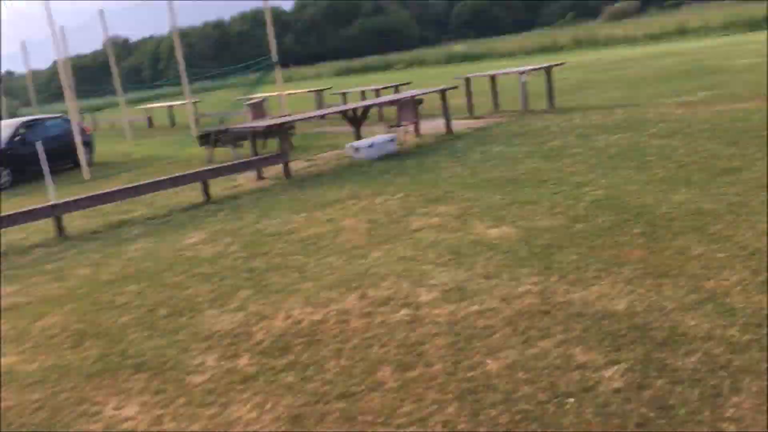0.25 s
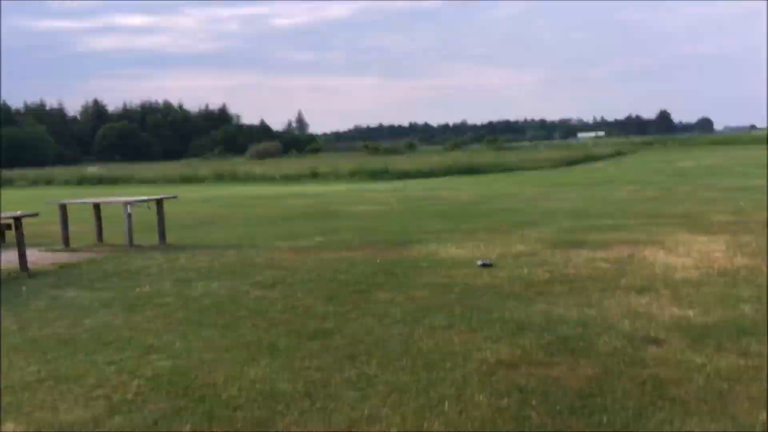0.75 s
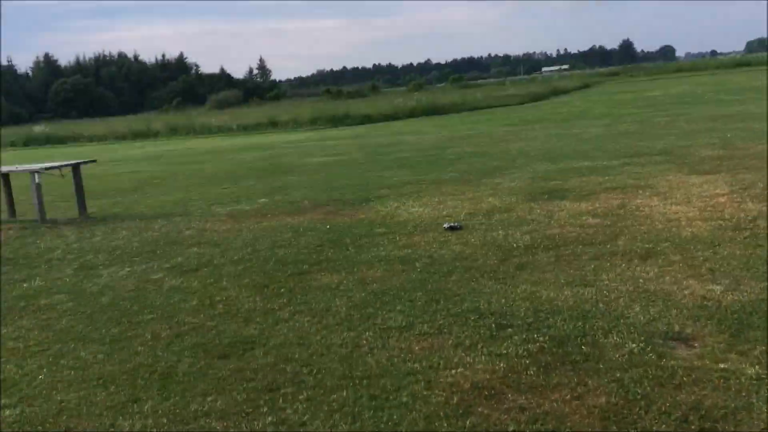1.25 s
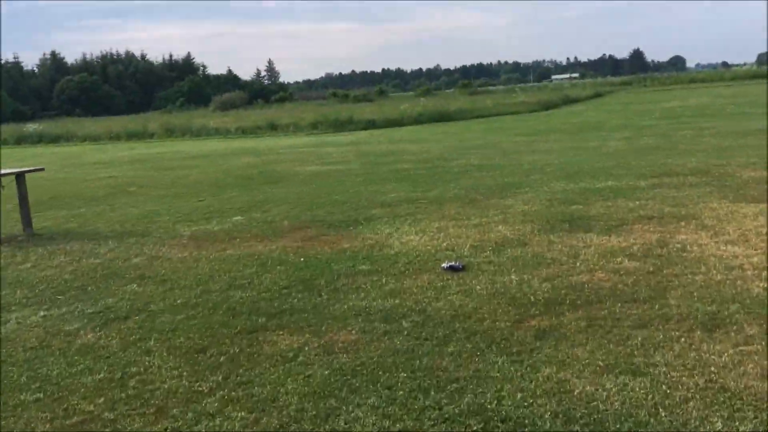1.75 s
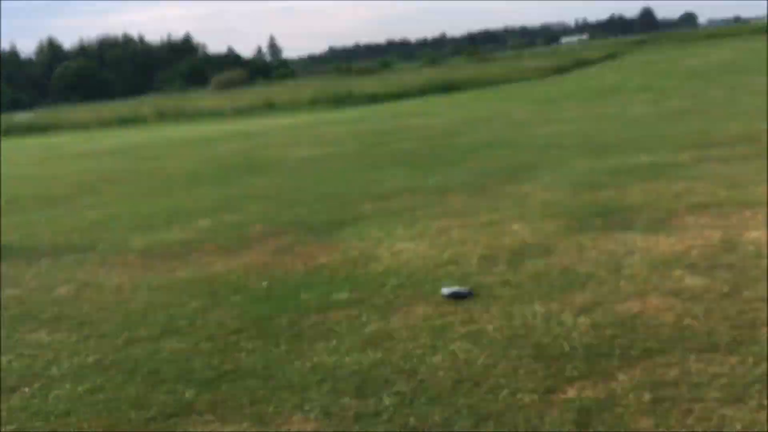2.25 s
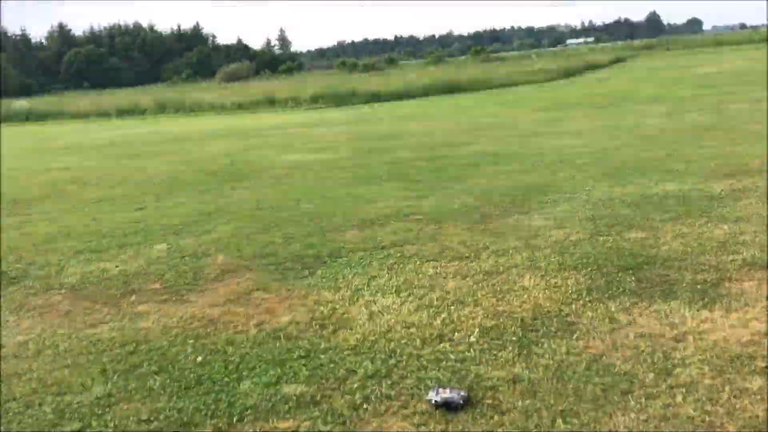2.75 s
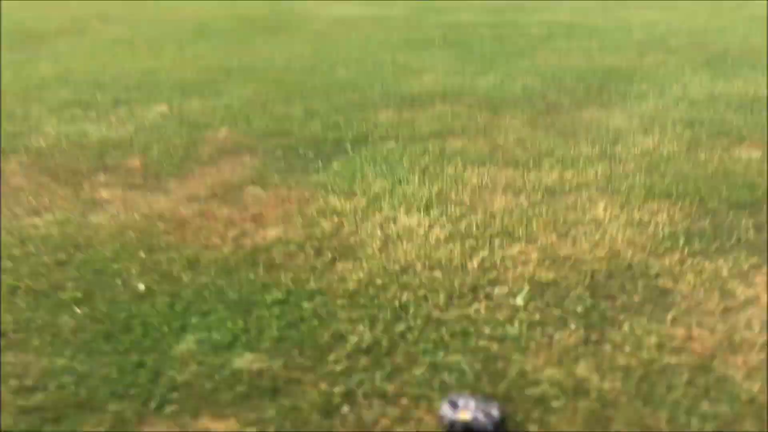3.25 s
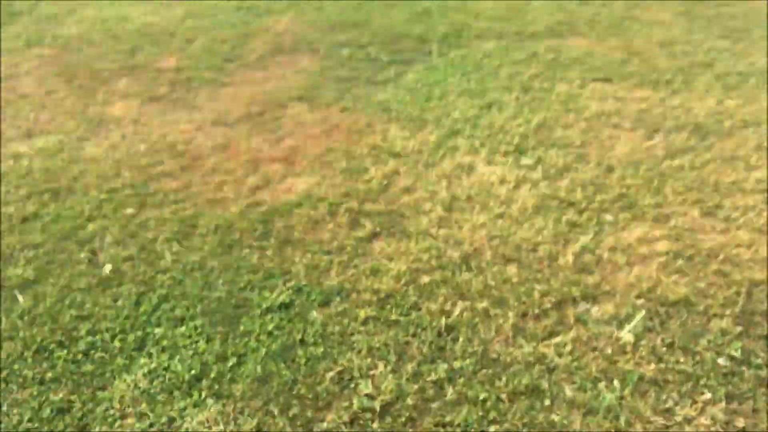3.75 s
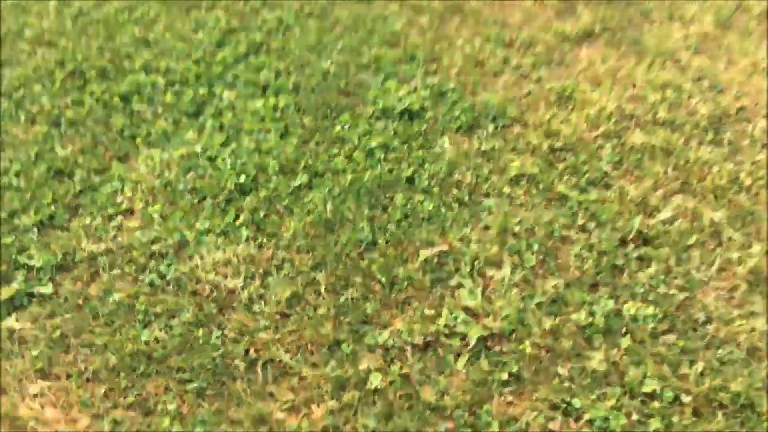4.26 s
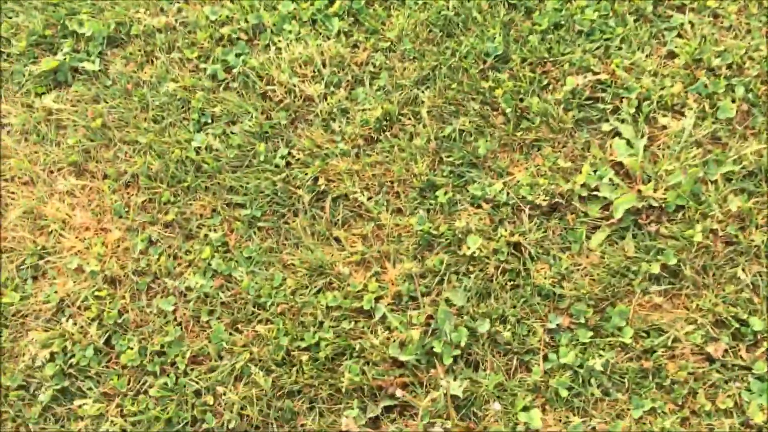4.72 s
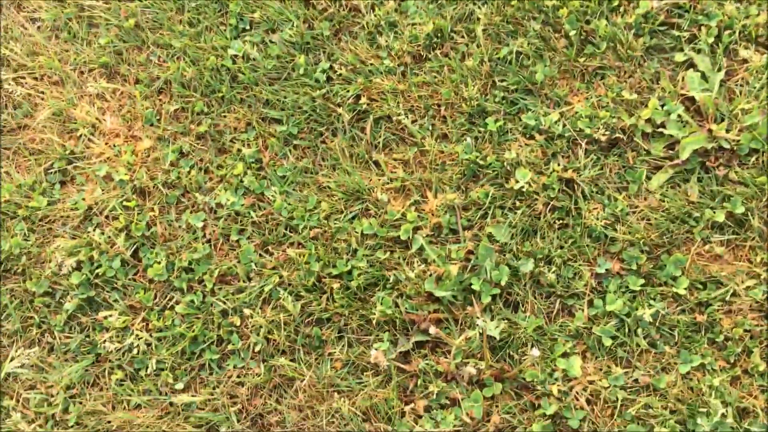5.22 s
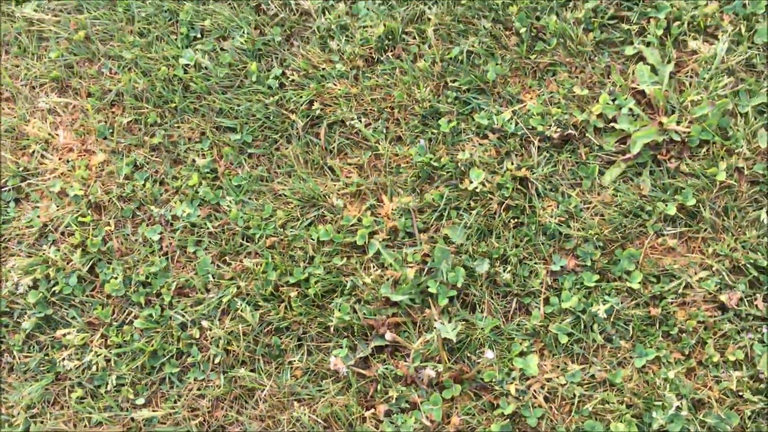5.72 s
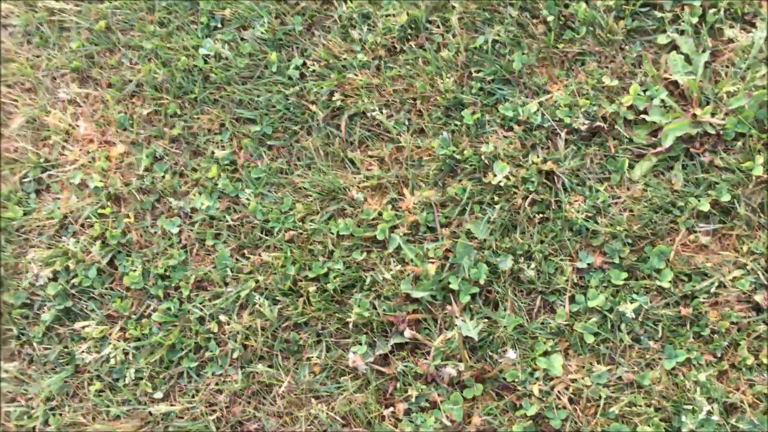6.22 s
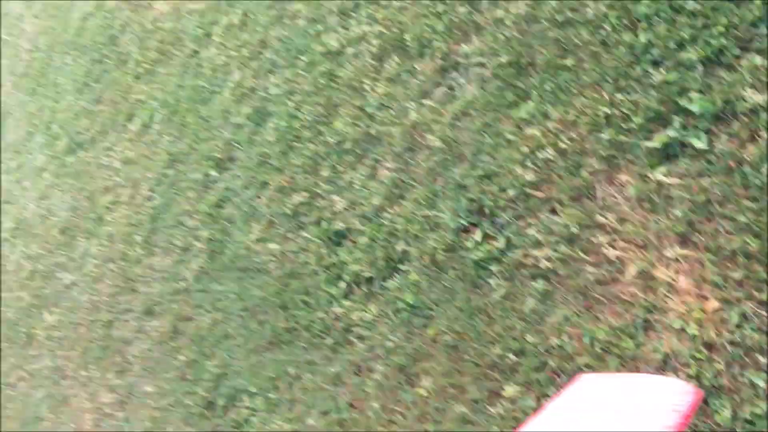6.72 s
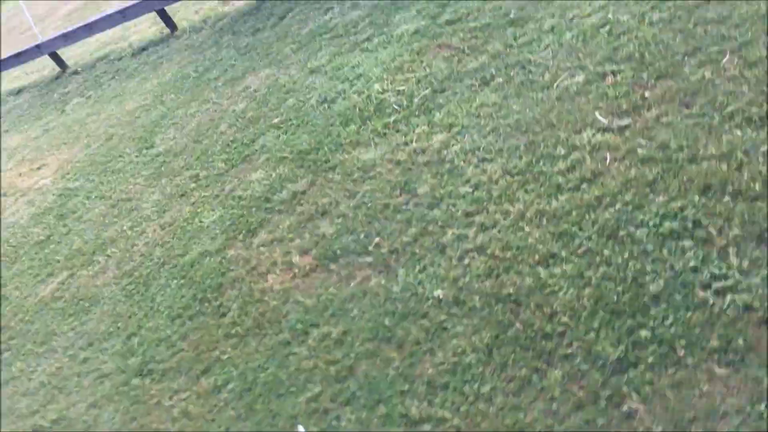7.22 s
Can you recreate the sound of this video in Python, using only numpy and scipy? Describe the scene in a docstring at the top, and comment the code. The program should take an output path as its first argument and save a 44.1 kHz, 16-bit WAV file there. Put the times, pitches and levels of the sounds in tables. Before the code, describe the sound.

Outdoors on grass, close to one phone microphone, a small electric ducted fan runs at full speed: a steady piercing whine with higher blade tones over airy roar and hiss. Low wind buffets thump underneath. Near six seconds power is cut, the pitch drops fast and fades, leaving faint open-field rush, small wind pops and a couple of hard bumps at the end.

```python
"""Ducted fan on a windy field

Outdoors on grass, one phone microphone close to a small electric ducted fan with eight blades at full speed.
Sines locked to the shaft make its whine, the blade passing and the octave; shaped noise makes drone, roar and hiss.
Power is cut and drag stops the rotor; the tones and the air stream fade as powers of its speed.
Wind buffets and pops on the microphone, with a low rush above the buffets that includes the fan's own noise;
behind lie a faint rush of the open field, leaf hiss and a far hum."""
import sys
import numpy as np
from scipy import signal
from scipy.fft import rfft, irfft, next_fast_len
from scipy.io import wavfile
from scipy.ndimage import uniform_filter1d, map_coordinates

SR = 44100
rng = np.random.default_rng(int(sys.argv[2]) if len(sys.argv) > 2 else 0)


def wrap_up_sound(samples):
    """Save the sound to the file named by the first command line argument, as 16-bit audio."""
    columns = np.atleast_2d(samples).T
    # keep every value between -1 and 1, then stretch to whole-number steps
    tamed = np.clip(columns, -1, 1)
    steps = np.round(tamed * 32767).astype(np.int16)
    wavfile.write(sys.argv[1], SR, steps)


N = 329868
T = np.arange(N) / SR  # time in s


def amp(db):
    """Gain of a level in dB."""
    return 10 ** (np.asarray(db) / 20)


def unit(x):
    """x at rms 1."""
    return x / np.sqrt(np.mean(x ** 2) + 1e-20)


def curves(rows):
    """One value per sample for each column after the time."""
    s, *columns = np.transpose(rows)
    return [np.interp(T, s, column) for column in columns]


def wobble(rate):
    """A smooth random curve, rate knots a second."""
    knots = rng.standard_normal(int(N * rate / SR) + 4)
    return map_coordinates(knots, [T * rate])


def filtered(x, response):
    """x times a response of frequency in Hz."""
    size = next_fast_len(N + 8192)
    spectrum = rfft(x, size) * response(np.fft.rfftfreq(size, 1 / SR))
    return irfft(spectrum, size)[..., :N]


def rush(spectrum, patchy_db):
    """Coloured noise of rms 1 with patches of random gain in time and frequency."""
    cells = signal.stft(rng.standard_normal(N + 512), nperseg=512)[2]
    patches = uniform_filter1d(rng.standard_normal(cells.shape), size=6, axis=0)
    patches = unit(uniform_filter1d(patches, size=12, axis=1))
    patchy = signal.istft(cells * amp(patchy_db * patches), nperseg=512)[1][:N]
    f, db = np.transpose(spectrum)

    def colour(hz):
        return amp(np.interp(np.log(hz + 1), np.log(f), db, -120, -120))

    return unit(filtered(patchy, colour))


# The fan under power, before flutter, wobble and run-down:
# [t/s, shaft rate f/Hz, shaft tone level/dB, blade tone level/dB, blade octave level/dB]
FAN_COURSE = [(0.0, 926.5, -22, -23.5, -28), (0.2, 925.6, -22.5, -22, -27), (0.5, 923.2, -22, -25, -30),
              (0.7, 919.8, -21.5, -27, -29.5), (0.95, 920.7, -18.5, -27, -32.5),
              (1.25, 921.2, -19, -27.5, -31), (1.7, 919.5, -19, -27.5, -31.5),
              (1.9, 920.7, -22, -27, -29.5), (2.3, 918.8, -21.5, -26, -30), (2.55, 919.2, -23.5, -28, -36),
              (2.75, 918.2, -21, -27, -31), (3.0, 917.5, -21.5, -24, -30), (3.25, 916.8, -20.5, -29, -37),
              (3.5, 916.8, -19, -31, -30), (3.85, 917.5, -20.5, -28, -32), (4.05, 917.2, -18, -26.5, -23.5),
              (4.25, 918.0, -16.5, -28, -25.5), (4.45, 916.0, -16.5, -22.5, -28),
              (4.61, 914.8, -17.5, -22, -29), (4.7, 909.0, -19, -20.5, -26.5),
              (4.9, 911.3, -19, -21.5, -26.5), (5.18, 910.8, -20.5, -21, -26.5),
              (5.37, 916.0, -22, -22, -25.5), (5.65, 909.7, -24, -20, -25.5), (5.9, 907.8, -24.5, -21, -25),
              (6.045, 909.0, -24.5, -23, -23.5)]
BLADES = 8


def fan_tones(speed, dip_db):
    """Sines locked to the shaft at its rate, the blade passing and its octave; each fades with the speed."""
    shaft_hz, shaft_db, blade_db, octave_db = curves(FAN_COURSE)
    rate_hz = shaft_hz * speed * (1 + .0007 * wobble(30))
    turn = 2 * np.pi * np.cumsum(rate_hz) / SR

    shaft = amp(shaft_db) * flutter() * speed ** 3.8 * np.sin(turn)

    # the blade tone wavers more as the rotor slows
    blade_gain = amp(blade_db + (1.5 + 3 * (1 - speed)) * wobble(120))
    blade_fade = speed ** 3.2 + .095 * speed ** .92
    blade = blade_gain * blade_fade * np.sin(BLADES * turn)

    octave_gain = amp(octave_db + 2.5 * wobble(150))
    octave_fade = speed ** 3.9 + .03 * speed
    octave = octave_gain * octave_fade * np.sin(2 * BLADES * turn)
    return np.sqrt(2) * (shaft + blade + octave) + shaft_lines(turn, speed, dip_db)


# Weaker shaft orders, before LINE_TRIM_DB and wobble:
# [multiple of the shaft rate, level/dB from the side, level/dB from behind the jet]
SHAFT_ORDERS = [(2, -47, -49), (3, -50, -50), (4, -46, -47), (5, -45, -53), (6, -44, -45), (7, -38, -42),
                (9, -47, -41), (10, -43, -37), (11, -40, -46), (12, -45, -46), (13, -47, -43),
                (14, -40, -41), (15, -38, -35), (17, -41, -38)]
LINE_TRIM_DB = -1.5
TURN_S = (4.1, 4.5)  # the phone swings round towards the jet, start and end t/s
STAND_OUT_DB = 8  # most that a line gains in a dip


def shaft_lines(turn, speed, dip_db):
    """Small blade differences leave a weak, fluttering line at each multiple of the shaft rate."""
    lines = np.zeros(N)
    for k, side_db, jet_db in SHAFT_ORDERS:
        place_db = np.interp(T, TURN_S, [side_db, jet_db])
        level_db = place_db + 2.5 * wobble(3) + 3 * wobble(50) + LINE_TRIM_DB
        # in a dip some lines go under, others stand out
        sinks = np.clip(.35 + wobble(25), -.6, 1)
        level_db = level_db + np.minimum(sinks * dip_db, STAND_OUT_DB)
        lines += amp(level_db) * speed ** 5.5 * np.sin(k * turn + k * k)
    return np.sqrt(2) * lines


# The air stream at full speed, outside the dips:
# [t/s, duct roar level/dB, intake drone level/dB, jet hiss level/dB]
AIR_COURSE = [(0.0, -25, -25.5, -20), (0.5, -26.5, -27, -23), (0.8, -28, -31, -23), (1.7, -29.5, -33, -23),
              (2.0, -26, -27.5, -22), (2.25, -28.5, -30.5, -23), (2.75, -26, -29, -21.5),
              (3.0, -27.5, -30, -22), (3.4, -25, -30, -21), (3.75, -27.5, -29.5, -21.5),
              (4.05, -25, -29, -19.5), (4.5, -27.5, -33, -18), (5.1, -28.5, -34, -19),
              (6.045, -28.5, -34, -19.5)]
# Colours of intake drone, duct roar and jet hiss: [f/Hz, relative level per Hz/dB]
DRONE_COLOUR = [(500, -20.5), (700, -14.5), (950, -6.5), (1300, -6.5), (1650, -5.5), (2050, 0),
                (2500, -5.5), (2900, -16), (3500, -31.5)]
ROAR_COLOUR = [(2200, -27.5), (2700, -5.5), (3500, -7), (4500, -4.5), (5000, -9), (5600, -4), (6400, -1.5),
               (7200, -9.5), (8000, -42)]
HISS_COLOUR = [(6500, -20), (7400, -7.5), (7900, -10), (9100, -2.5), (10000, -5), (10600, -8.5),
               (11500, -3), (13000, -3.5), (14500, -2.5), (16000, -4.5)]


def air_stream(speed, dip_db):
    """Turbulence at the intake, in the duct and in the jet behind it; the hiss dips least."""
    roar_db, drone_db, hiss_db = curves(AIR_COURSE)
    drone = amp(drone_db) * speed ** 1.36 * rush(DRONE_COLOUR, patchy_db=1.57)
    roar = amp(roar_db) * speed ** 1.97 * rush(ROAR_COLOUR, patchy_db=1.6)
    hiss = amp(hiss_db) * speed ** 2.52 * rush(HISS_COLOUR, patchy_db=1.3)
    return amp(dip_db) * (drone + roar) + amp(0.49 * dip_db) * hiss


# Wind buffets and the low rush above them, before single gusts add their power; the rush outside the dips:
# [t/s, low buffet level/dB, upper buffet level/dB, low rush level/dB]
BUFFET_COURSE = [(0.0, -36, -25.5, -34.5), (0.3, -30, -30.5, -40), (0.6, -23, -28.5, -37),
                 (0.95, -23, -32, -37), (1.2, -18, -24.5, -37.5), (1.45, -20, -23.5, -37.5),
                 (1.8, -26, -22.5, -39), (1.93, -33.5, -32, -38.5), (2.1, -19, -25.5, -37),
                 (2.33, -26.5, -32.5, -41), (2.52, -25.5, -22.5, -33.5), (2.69, -32, -33.5, -37.5),
                 (2.87, -27, -23.5, -38), (3.2, -27.5, -33, -38.5), (3.44, -21, -17, -38),
                 (3.58, -20.5, -29.5, -37), (3.95, -24.5, -28.5, -39.5), (4.3, -25, -34.5, -39.5),
                 (4.58, -39, -40.5, -42), (4.85, -30, -29.5, -44), (5.04, -43.5, -35.5, -44.5),
                 (5.27, -27.5, -35, -42), (5.5, -37, -39, -49.5), (5.95, -44.5, -46.5, -48),
                 (6.15, -41, -37, -46), (6.3, -40.5, -44, -52), (6.7, -37, -49, -60),
                 (6.93, -34, -38.5, -50), (7.02, -39, -48, -52.5), (7.18, -38, -51.5, -48),
                 (7.32, -42, -52, -55), (7.4, -37, -39, -45), (7.48, -21, -24, -32)]
# Single gusts that stand out: [t/s of the crest, low buffet level/dB, upper buffet level/dB]
GUST_EVENTS = [(0.435, -21, -24), (0.71, -25, -25), (1.09, -22, -23), (1.235, -13, -19.5),
               (1.36, -15.5, -27), (1.48, -31, -25), (1.58, -18, -33.5), (1.84, -26, -22),
               (2.085, -19, -20), (2.185, -19.5, -16.5), (2.25, -21.5, -21), (2.39, -23, -31),
               (2.54, -19, -25), (3.43, -18, -20), (3.66, -21, -25), (3.82, -20, -25), (3.96, -21, -21),
               (4.81, -20, -30), (4.9, -18, -31), (5.23, -26, -33), (5.355, -23.5, -32), (5.57, -27, -37.5),
               (6.37, -31, -38), (6.49, -32, -35), (6.585, -26, -34.5), (6.685, -34, -38),
               (6.77, -42, -31.5), (6.83, -29, -35), (6.89, -29, -39), (7.07, -36, -34.5),
               (7.365, -32, -29), (7.44, -28, -21)]
GUST_HALF_S, GUST_RUSH_DB = 0.015, -21  # half length; level a gust adds to the low rush, against the upper buffet
# Colours of low buffet, upper buffet and low rush: [f/Hz, relative level per Hz/dB]
LOW_COLOUR = [(15, -41), (30, -22), (50, 0), (80, -1.5), (110, -3.5), (150, -28.5), (300, -58)]
UPPER_COLOUR = [(70, -42), (115, 0.5), (200, -2.5), (300, -11), (380, -26), (600, -65.5)]
LOW_RUSH_COLOUR = [(250, -40), (340, -2), (500, -3), (750, -5), (1000, -19), (1500, -50.5)]


def buffets_and_low_rush(dip_db):
    """Low and upper wind buffets, and a low rush above them that includes the fan's own noise; only this rush dips."""
    low_power, upper_power, rush_power = amp(curves(BUFFET_COURSE)) ** 2
    for s, low_db, upper_db in GUST_EVENTS:  # powers add
        swell = np.exp(-((T - s) / GUST_HALF_S) ** 2)
        low_power = low_power + swell * amp(2 * low_db)
        upper_power = upper_power + swell * amp(2 * upper_db)
        rush_power = rush_power + swell * amp(2 * (upper_db + GUST_RUSH_DB))

    lumps = wobble(22)  # shared by all three bands
    low_lumps = amp(0.69 * lumps + 0.36 * wobble(5.1))
    upper_lumps = amp(1.9 * lumps + 2.07 * wobble(60))
    rush_lumps = amp(1.7 * lumps + 2.2 * wobble(90))
    low = np.sqrt(low_power) * unit(low_lumps * rush(LOW_COLOUR, patchy_db=-2.7))
    upper = np.sqrt(upper_power) * unit(upper_lumps * rush(UPPER_COLOUR, patchy_db=0.15))
    low_rush = np.sqrt(rush_power) * unit(rush_lumps * rush(LOW_RUSH_COLOUR, patchy_db=-0.05))
    return low + upper + amp(1.4 * dip_db) * low_rush


# The open field behind everything, outside the dips: [t/s, rush level/dB, leaf hiss level/dB]
FIELD_COURSE = [(6.4, -53.5, -57), (6.83, -49.5, -58), (7.05, -40.5, -48.5), (7.28, -48, -53.5),
                (7.48, -55, -52)]
# Colours of the rush over the grass and of the leaves: [f/Hz, relative level per Hz/dB]
GRASS_COLOUR = [(250, -26.5), (450, -9.5), (750, -8), (1100, -4.5), (1500, -3.5), (1900, -7.5), (2500, -11),
                (3000, -27), (3500, -51.5)]
LEAF_COLOUR = [(2300, -30), (2900, -6), (3400, 0), (3750, -3), (4100, -11), (5000, -15), (6000, -16),
               (7000, -25), (10000, -29), (12500, -30), (15900, -34)]
# A faint far hum, before wobble: [multiple of HUM_HZ, peak level/dB]
HUM_LINES = [(6, -65), (8, -58.5), (9, -62), (10, -56.5), (11, -71), (16, -61), (17, -62.5), (18, -58.5),
             (24, -64)]
HUM_HZ = 100.53


def open_field(dip_db):
    """A soft rush over the grass and hissing leaves as noise, with a faint far hum of sines at steady pitch."""
    rush_db, leaf_db = curves(FIELD_COURSE)
    grass = amp(rush_db) * rush(GRASS_COLOUR, patchy_db=2.0)
    leaves = amp(leaf_db) * rush(LEAF_COLOUR, patchy_db=-1.5)
    hum = np.zeros(N)
    for k, db in HUM_LINES:
        hum += amp(db + 1.5 * wobble(3.7)) * np.sin(2 * np.pi * k * HUM_HZ * T + k * k)
    return amp(dip_db) * (grass + leaves + hum)


# Brief dips of roar, hiss, low rush and field while some tones carry on: [t/s of the middle, half length/s]
DIP_EVENTS = [(.259, .0135), (.312, .0045), (.355, .0045), (.409, .0125), (1.848, .005), (1.975, .005),
              (2.018, .005), (2.104, .005), (3.32, .005), (3.469, .005), (3.533, .0045), (3.641, .022),
              (3.811, .005), (4.046, .005), (4.429, .005), (4.494, .005), (4.621, .005), (4.707, .0055),
              (5.133, .005), (5.539, .005), (5.58, .005), (5.624, .005), (5.73, .005), (5.859, .005),
              (5.966, .005)]
DIP_DB, DIP_DB_PER_S = -10, -1500  # depth, and its growth with half length


def dips():
    """Level of the brief dips in dB; longer dips go deeper."""
    dip_db = np.zeros(N)
    for s, half_s in DIP_EVENTS:
        depth_db = DIP_DB + DIP_DB_PER_S * half_s
        dip_db += depth_db * np.exp(-((T - s) / half_s) ** 4)
    return dip_db


# Spells in which the shaft tone flutters: [start t/s, end t/s, rms depth as a share of the tone]
FLUTTER_SPELLS = [(1.76, 2.32, .19), (2.38, 2.67, .3), (2.75, 3.02, .27), (3.12, 3.33, .35)]
CALM, FLUTTER_EDGE_S = .04, .05  # rms depth outside the spells; ramp at each end


def flutter():
    """Gain of the shaft tone as the airframe shudders some 65 times a second, calm except in its spells."""
    depth = np.full(N, CALM)
    for start, end, spell_depth in FLUTTER_SPELLS:
        corners = [start - FLUTTER_EDGE_S, start, end, end + FLUTTER_EDGE_S]
        depth += (spell_depth - CALM) * np.interp(T, corners, [0, 1, 1, 0])
    shake = wobble(60) * np.sin(2 * np.pi * 65 * T) + .5 * wobble(190)
    return 1 + depth * unit(shake * amp(3.3 * wobble(12)))


# Sharp wind pops on the microphone: [t/s, one POP_S before the onset; approximate peak level/dB]
POP_EVENTS = [(5.359, -15), (6.219, -15), (6.229, -25), (6.261, -28), (6.316, -27), (6.355, -22),
              (6.38, -33), (6.425, -29), (6.482, -24.5), (6.56, -29), (6.764, -28), (6.827, -21.5),
              (7.344, -33), (7.358, -28), (7.373, -22), (7.414, -28), (7.435, -8.5), (7.46, -22),
              (7.469, -10)]
POP_S = 0.0013  # time scale of a pop


def wind_pops():
    """The sharpest eddies are single pops: a short suck and rebound of pressure."""
    pops = np.zeros(N + SR)
    u = np.arange(SR // 20) / SR / POP_S
    shape = np.sin(1.88 * u) * u * np.exp(1 - u)
    for s, db in POP_EVENTS:
        first = round((s + POP_S) * SR)
        pops[first:first + len(u)] -= amp(db) * shape
    return pops[:N]


CUT_S, FREE_S = 6.052, 6.122  # t/s: the throttle closes, the motor lets go
LET_GO, DRAG_S = .895, .071  # share of full speed left at let-go; drag time constant in s


def rundown():
    """Share of full speed: an even ramp down, then air drag that grows with speed squared."""
    ramp = np.interp(T, [CUT_S, FREE_S], [1, LET_GO])
    return ramp / (1 + np.maximum(T - FREE_S, 0) / DRAG_S)


def scene():
    """Fan, wind and field at one microphone, on both channels."""
    speed, dip_db = rundown(), dips()
    mono = fan_tones(speed, dip_db) + air_stream(speed, dip_db)
    mono = mono + buffets_and_low_rush(dip_db) + wind_pops()
    mono = mono + open_field(dip_db)
    return np.array([mono, mono])


TOP_HZ = 15900  # upper band limit of the phone


def record(dry):
    """The phone keeps nothing above its band limit; a smooth slope fills the last 300 Hz below it."""
    def band_limit(hz):
        return np.sin(np.pi / 2 * np.clip((TOP_HZ - hz) / 300, 0, 1)) ** 2

    return filtered(dry, band_limit)


dry = scene()
out = record(dry)
wrap_up_sound(out)
```